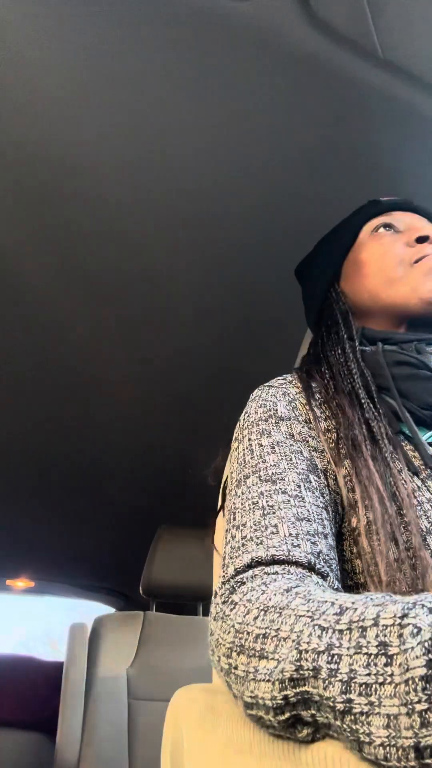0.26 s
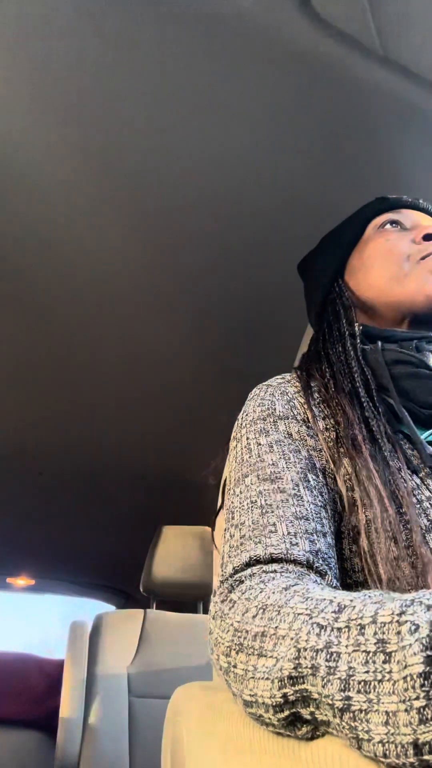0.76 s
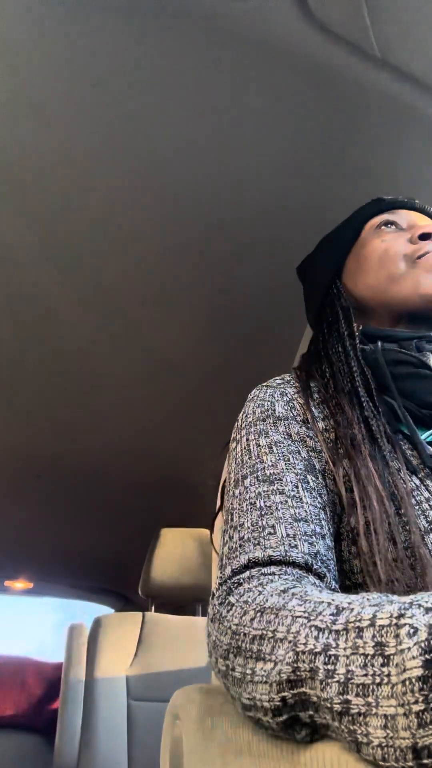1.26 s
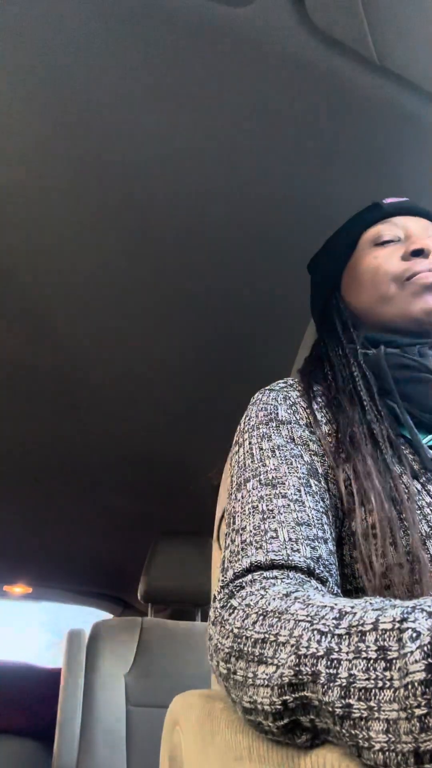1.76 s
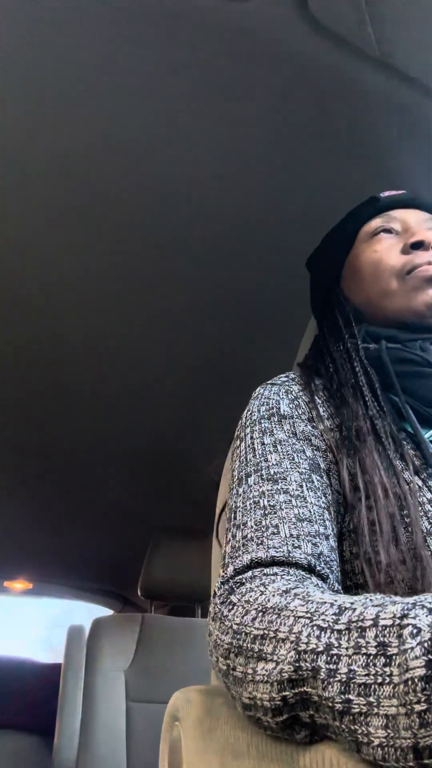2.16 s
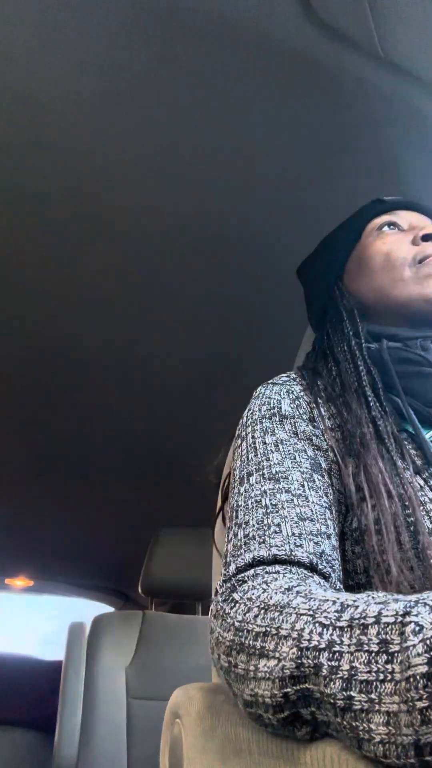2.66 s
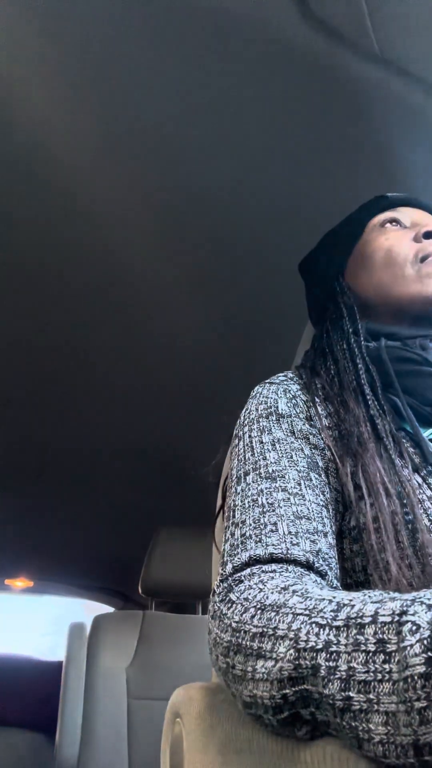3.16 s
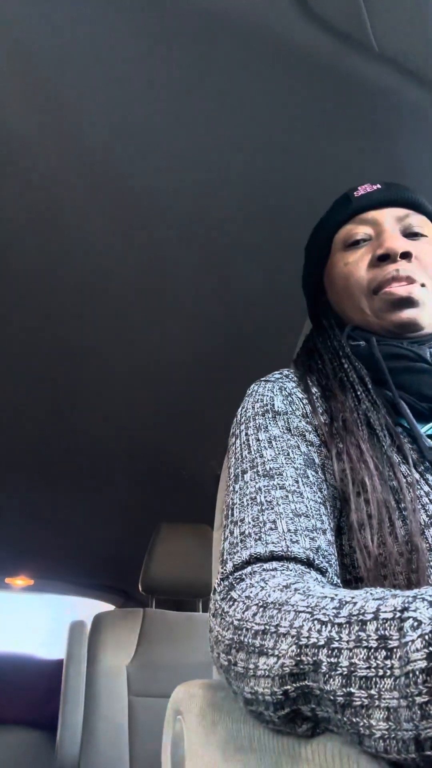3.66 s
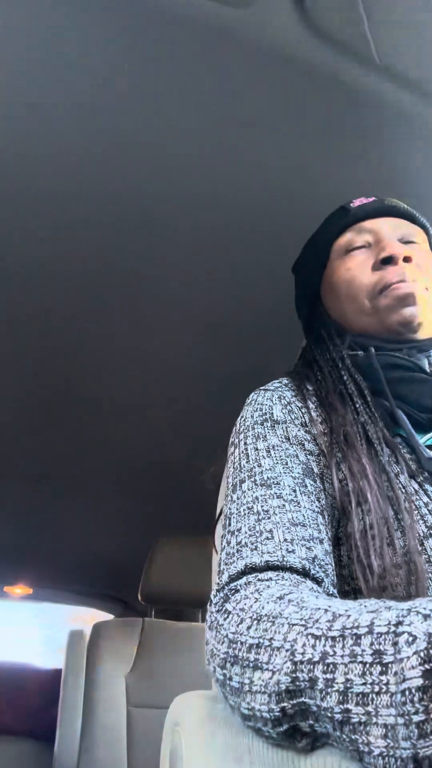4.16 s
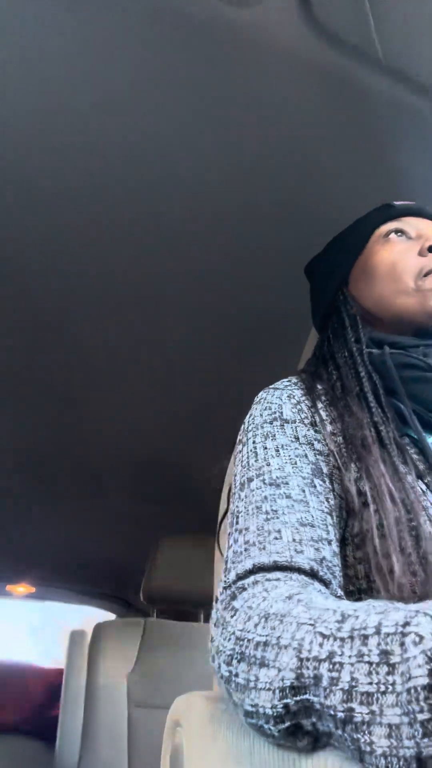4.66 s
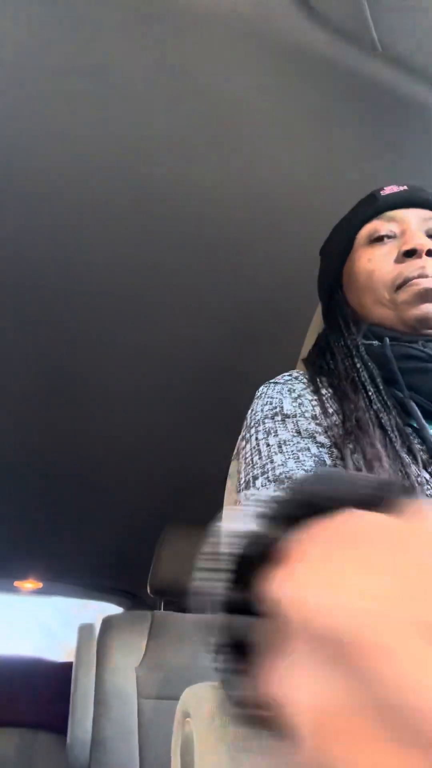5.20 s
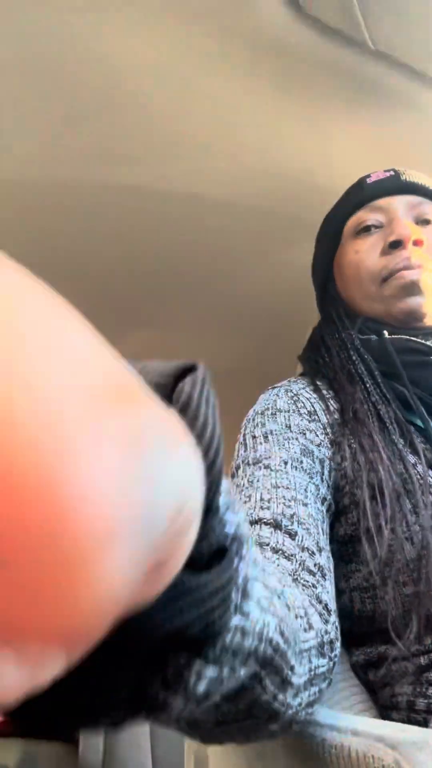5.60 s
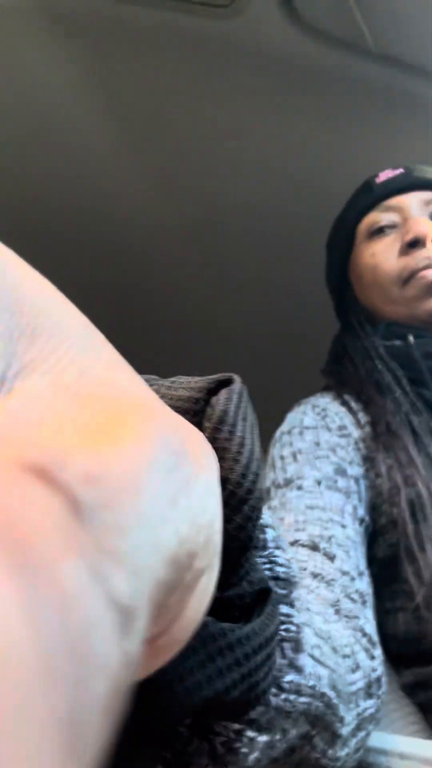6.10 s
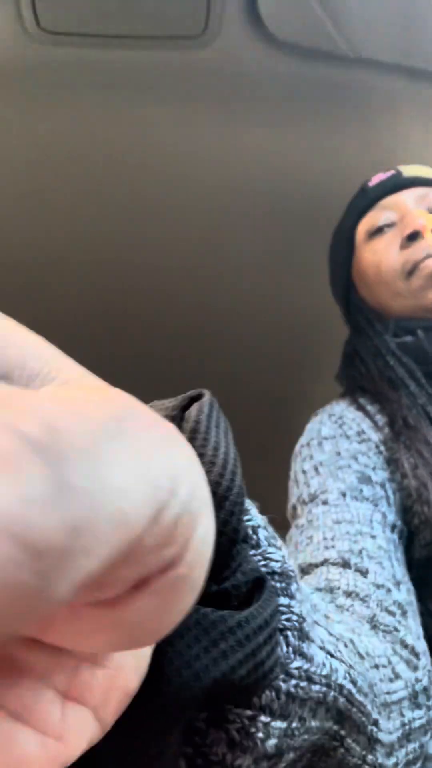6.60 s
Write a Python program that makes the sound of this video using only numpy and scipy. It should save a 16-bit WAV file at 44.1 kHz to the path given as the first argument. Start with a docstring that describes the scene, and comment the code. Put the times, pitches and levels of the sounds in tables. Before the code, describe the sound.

Car interior on city streets: deep body boom swells over bumps, with engine drone and muffled tyre roar. Very close to the right microphone, a phone rattles in its holder, bright ticks and duller tocks in uneven flurries with brief gaps. After about five seconds a hand takes hold; cloth and skin rustle, plastic creaks, a soft thud lingers, and the rattling stops.

```python
"""Inside a car on city streets, heard from a phone's two microphones. From the start the body booms, tyres
and engine drone through the cabin, and the phone rattles in its dashboard holder right beside its right
microphone: a bright tick one way, a dull tock back, made by short pushes that ring damped resonances.
Near the end a hand takes hold of the phone: cloth and skin rustle, the holder creaks and a dull thud
lingers. Boom is wavering sines and noise; drone, air and rustle are shaped noise with moving levels."""
import sys
import numpy as np
from scipy import signal
from scipy.fft import rfft, irfft, next_fast_len
from scipy.io import wavfile
from scipy.ndimage import uniform_filter1d, map_coordinates

SR = 44100
rng = np.random.default_rng(int(sys.argv[2]) if len(sys.argv) > 2 else 0)


def log_audio(samples):
    """Write samples as a 16-bit WAV file to the path given in sys.argv[1]."""
    # one column per channel
    frames = np.atleast_2d(samples).T
    # limit to full scale, then quantise
    limited = np.clip(frames, -1, 1)
    pcm = np.round(limited * 32767).astype(np.int16)
    wavfile.write(sys.argv[1], SR, pcm)


N = 301635  # length in samples

# Hard contacts of phone and holder. Each row: start in seconds, knock in dB,
# crack in dB before the lift common to all cracks.
TICK_HITS = [(0.0292, -13.5, -35.5), (0.0661, -14, -35), (0.1247, -6, -32), (0.1746, -4.5, -33.5),
             (0.2104, -16, -39), (0.5748, -8.5, -34.5), (0.6111, -19.5, -44), (0.7954, -8, -37.5),
             (0.832, -12, -39), (0.8508, -13, -48), (0.8853, -12.5, -33), (0.9393, -15.5, -37.5),
             (1.0353, -9, -34.5), (1.0858, -8, -31.5), (1.1164, -6.5, -30), (1.1459, -13, -38),
             (1.1767, -6.5, -30.5), (1.2307, -20.5, -44), (1.2813, -5, -36), (1.3166, -8.5, -38),
             (1.3567, -1.5, -38), (1.408, -16.5, -40), (1.499, -16.5, -47), (1.5323, -7, -33.5),
             (1.587, -12.5, -30), (1.6737, -13, -38), (1.7297, -2.5, -32.5), (1.7624, -9, -31.5),
             (1.8184, -23.5, -65.5), (1.894, -12, -39), (1.977, -6, -31), (2.0055, -7, -28.5),
             (2.2769, -7, -32.5), (2.3278, -7, -33), (2.3955, -12.5, -37), (2.471, -6.5, -33),
             (2.5263, -12, -39), (2.556, -8, -30.5), (2.5867, -5, -29), (2.6713, -7.5, -33.5),
             (2.7308, -17, -45), (2.7562, -17.5, -38), (2.7853, -6.5, -38), (2.8166, -10.5, -36.5),
             (2.8778, -13, -41.5), (2.927, -10.5, -36), (2.9567, -6, -32), (3.0066, -5.5, -30),
             (3.0425, -7, -32), (3.124, -14, -37), (3.41, -21, -59), (3.6764, -6.5, -33),
             (3.7281, -18, -44), (3.76, -19, -43), (3.7917, -11, -35), (3.8407, -9, -34), (3.8765, -6, -32),
             (3.9163, -13.5, -44), (3.9375, -17, -33.5), (3.9675, -15, -40), (3.992, -6, -33.5),
             (4.0266, -10.5, -36), (4.081, -7, -30.5), (4.119, -11, -37.5), (4.384, -9, -37),
             (4.426, -4.5, -29), (4.4786, -8.5, -35), (4.5074, -15.5, -37.5), (4.7043, -7, -39),
             (4.7423, -8.5, -34.5), (4.795, -1.5, -26), (5.042, -14, -32), (5.1255, -8.5, -33),
             (5.157, -9, -37.5), (5.252, -5, -31), (5.3155, -13.5, -34.5), (5.6198, -8, -27.5)]
# Padded contacts on the way back. Each row: start in seconds, knock in dB.
TOCK_HITS = [(0.0461, -4.5), (0.0808, -13.5), (0.141, -17), (0.192, -9), (0.2298, -27), (0.586, -16.5),
             (0.8112, -9), (0.8666, -6.5), (0.8932, -23.5), (1.1006, -8.5), (1.1306, -9.5), (1.1571, -7),
             (1.1902, -16.5), (1.297, -10), (1.339, -1), (1.3748, -16), (1.51, -20.5), (1.546, -18.5),
             (1.5984, -15), (1.6934, -12.5), (1.742, -9), (1.7776, -10.5), (1.984, -16), (2.0191, -14.5),
             (2.2846, -25), (2.342, -11), (2.3629, -8), (2.3744, -10.5), (2.4, -26), (2.487, -12.5),
             (2.5368, -16), (2.5686, -6.5), (2.6006, -6.5), (2.6855, -23), (2.7598, -21), (2.7967, -7),
             (2.8279, -13.5), (2.8869, -27), (2.9679, -22.5), (3.015, -22), (3.6854, -17), (3.7449, -8),
             (3.774, -18), (3.8001, -20.5), (3.8527, -23), (3.895, -8.5), (3.9209, -22), (3.945, -18),
             (4.0082, -4), (4.0458, -11), (4.0977, -12.5), (4.1243, -26), (4.4381, -17.5), (4.4893, -16),
             (4.518, -23), (4.724, 0), (4.7564, -9.5), (4.8077, -12), (5.1315, -19.5), (5.1742, -19.5),
             (5.3238, -23), (5.4715, -16.5), (5.4887, -11), (5.5062, -19), (5.519, -17.5), (5.6386, -24),
             (5.6557, -24.5), (5.6691, -7.5), (5.6888, -11), (5.6991, -15.5), (5.7421, -20),
             (5.7585, -21.5), (5.7697, -16), (5.8218, -16), (5.836, -25), (5.8826, -9), (5.904, -22),
             (5.9443, -27), (5.9613, -3.5)]
# Middle pitches of the shell's three boom modes, in Hz.
BOOM_HZ = [40.13, 57.8, 79.85]
# Noise colours of engine drone, tyre roar, skin on the case, cloth, and the finest rustle.
# Each row: frequency in Hz, relative level in dB per Hz.
DRONE_COLOUR = [(79, -42), (135, -6), (167, -7), (199, -1), (253, -4), (335, -6), (372, -13.5),
                (480, -16.5), (620, -32.5), (1060, -120)]
TYRE_COLOUR = [(250, -30), (420, -5.5), (472, -8), (587, -8.5), (628, -7.5), (896, -12.5), (1100, -31),
               (1430, -48.5), (2420, -120)]
SKIN_COLOUR = [(120, -55), (220, -8.5), (600, 0.5), (1200, -5.5), (2500, -8), (3600, -19.5), (6000, -50)]
CLOTH_COLOUR = [(1470, -42.5), (2500, -9.5), (2970, -15.5), (4890, -12), (5310, -14), (8980, -21.5),
                (9500, -38), (12400, -55.5), (20900, -120)]
FIZZ_COLOUR = [(5290, -35.5), (9000, -7), (11900, -4), (15000, -4.5), (16000, -11), (16500, -40)]


def amp(db):
    """Gain of a level in dB."""
    return 10 ** (np.asarray(db) / 20)


def unit(x):
    """Scaled to rms 1."""
    return x / np.sqrt(np.mean(x ** 2) + 1e-20)


def along(points, hz):
    """Values between (Hz, value) points, on a log frequency axis."""
    f, v = np.transpose(points)
    return np.interp(np.log(hz + 1), np.log(f + 1), v)


def curves(rows):
    """One value per sample for each column after the time."""
    s, *cols = np.transpose(rows)
    return [np.interp(np.arange(N) / SR, s, c) for c in cols]


def wobble(rate):
    """A smooth random curve, rate knots a second."""
    knots = rng.standard_normal(int(N * rate / SR) + 4)
    return map_coordinates(knots, [np.arange(N) * rate / SR])


def together(*gains):
    """Gain of unrelated parts sounding at once: their powers add."""
    return np.sqrt(sum(np.square(g) for g in gains))


def filtered(x, response):
    """x through a complex response of frequency, padded so that its ringing does not wrap round."""
    m = next_fast_len(x.shape[-1] + SR // 2)
    return irfft(rfft(x, m) * response(np.fft.rfftfreq(m, 1 / SR)), m)[..., :x.shape[-1]]


def modes(table):
    """Causal response of a set of damped resonances."""
    return lambda f: sum(sign * amp(db) * 1j * f * w / (c * c - f * f + 1j * f * w)
                         for c, w, db, sign in table)


def lagging(hz):
    """Turns the left channel behind the right by a phase that depends on frequency, half on each side."""
    # Each row: frequency in Hz, radians that the left is behind the right.
    lag = [(40, .17), (130, .1), (220, 0), (700, .1), (1100, 1.2), (1900, 2.8), (5500, 3.6), (6900, 3.1),
           (9700, 1.8), (12400, .5), (14000, 0)]
    return np.exp(1j * np.outer([-.5, .5], along(lag, hz)))


def rush(spectrum, patchy_db):
    """Noise of rms 1 over both microphones, with patches of random gain in time and pitch."""
    # Each row: frequency in Hz, likeness of left and right.
    alike = [(60, 0.85), (130, 0.85), (220, 0.83), (330, 0.51), (640, 0.69), (1100, 0.24), (1700, .3),
             (3000, 0.15), (6500, 0.27), (10000, .7), (13000, .88)]
    # Each row: frequency in Hz, left minus right in dB.
    lean = [(60, -1.3), (380, -1), (700, 2.5), (2400, 4.5), (8000, 4.5), (15000, -2.5)]
    z = signal.stft(rng.standard_normal((2, N)), nperseg=512)[2]
    field = uniform_filter1d(uniform_filter1d(rng.standard_normal(z.shape[1:]), 5, 0), 8, 1)
    pair = signal.istft(z * amp(patchy_db * unit(field)), nperseg=512)[1][:, :N]

    def colour(hz):
        turn = np.arccos(np.clip(along(alike, hz), -1, 1)) / 2  # shares noise between middle and side
        return amp(along(spectrum, hz)) * [np.cos(turn), np.sin(turn)]

    mid, side = filtered(pair, colour)
    placing = lambda hz: amp(np.outer([.5, -.5], along(lean, hz))) * lagging(hz)
    return unit(filtered(np.array([mid + side, mid - side]), placing))


def strike(seconds, db, short, long):
    """Blows at the given times, each a random blend of the short and the long contact's sound."""
    share = rng.uniform(size=len(seconds))
    at = np.round(seconds * SR).astype(int)
    return sum(signal.fftconvolve(np.bincount(at, amp(db) * part, N)[None], shape, axes=1)[:, :N]
               for part, shape in ((share, short), (1 - share, long)))


def knock(table, contact_s, paths):
    """A smooth push of the contact's length rings the modes; the left microphone gets it weak, late and dull."""
    through_db, dull_hz = -21, 1800  # loss common to all paths to the left, and its one-pole corner
    t = np.arange(2048) / SR
    push = np.sin(np.pi * np.clip(t / contact_s, 0, 1)) ** 2
    near = filtered(push, modes(table))
    arrivals = lambda f: sum(amp(through_db + db) * np.exp(-2j * np.pi * f * s) for s, db in paths)
    far = filtered(near, lambda f: arrivals(f) / (1 + 1j * f / dull_hz))
    return np.array([far, near]) / np.abs(near).max()


def rattle_knocks():
    """Ticks ring the phone case and tocks the holder arm; both travel through the phone."""
    # Resonances of case and arm. Each row: pitch in Hz, width in Hz, level in dB, signed gain on it.
    tick_modes = [(3120, 3760, 14.5, 0.94), (1296, 2600, -16.5, 1), (373, 23, -2.5, -1.24)]
    tock_modes = [(1650, 3700, 5.5, 0.97), (900, 200, -11, -1.2), (391, 58, 8.5, -0.76)]
    # Ways to the left microphone. Each row: delay in seconds, level in dB before the common loss.
    tick_paths = [(.00055, 5), (.0012, -7.5)]
    tock_paths = [(.00002, -10), (.0018, -3.5)]
    # the two numbers in each list: shortest and longest contact (s)
    tick_shapes = [knock(tick_modes, contact_s, tick_paths) for contact_s in (.00046, .0005)]
    tock_shapes = [knock(tock_modes, contact_s, tock_paths) for contact_s in (.00047, .00052)]
    tick_s, tick_db, _ = np.transpose(TICK_HITS)
    tock_s, tock_db = np.transpose(TOCK_HITS)
    return strike(tick_s, tick_db, *tick_shapes) + strike(tock_s, tock_db, *tock_shapes)


def rattle_cracks():
    """Each contact also cracks, a click and a burst of grit that ring bright modes through the air."""
    # Bright resonances. Each row: pitch in Hz, width in Hz, level in dB, signed gain on it.
    crack_modes = [(4970, 5600, 7.5, 0.54), (6270, 590, 6, 0.77), (6880, 310, -3.5, 0.73),
                   (9100, 780, -8, 0.44), (11030, 380, 0.5, 0.92), (11600, 100, 0, 0.7),
                   (13200, 690, 1.5, 1), (13800, 1100, -18, 0.95), (15600, 900, -22, 0.55)]
    # Each row: frequency in Hz, left minus right in dB.
    crack_lean = [(4000, -13.5), (6000, -5.5), (7500, 12), (9000, -2), (16000, 2)]
    grit_t60_s, lift_db = .0035, 13.0
    tick_s, _, crack_db = np.transpose(TICK_HITS)
    tock_s, tock_db = np.transpose(TOCK_HITS)
    t = np.arange(400) / SR
    clicks = np.zeros(N + len(t))
    for at, db in np.r_[np.c_[tick_s, crack_db], np.c_[tock_s, tock_db - 43]]:
        grit = rng.standard_normal(len(t)) * amp(-60 * t / grit_t60_s)
        # the crack leads the knock by four samples
        clicks[round(at * SR) - 4:][:len(t)] += amp(db + lift_db) * ((t == 0) + 0.35 * grit)
    ports = lambda f: amp(np.outer([.5, -.5], along(crack_lean, f))) * lagging(f)
    return filtered(clicks[:N], lambda f: modes(crack_modes)(f) * ports(f))


def shudder():
    """Every tock sets the holder's arm swaying for a few low cycles, its pitch settling downwards."""
    sway_hz, start_hz, settle_s = 295, 545, .003
    sway_db, t60_s = -11, .05  # level against the tock
    left_s, left_db = .001, -1  # later and softer at the left microphone
    # Rise times in seconds: left, right.
    rise_s = (.003, .001)
    t = np.clip(np.arange(SR // 16) / SR - np.array([[left_s], [0]]), 0, None)
    turns = sway_hz * t + (start_hz - sway_hz) * settle_s * (1 - np.exp(-t / settle_s))
    rise = 1 - np.exp(-t / np.reshape(rise_s, (2, 1)))
    fall = amp(sway_db - 60 * t / t60_s + np.array([[left_db], [0]]))
    sway = -np.cos(2 * np.pi * turns) * rise * fall
    s, db = np.transpose(TOCK_HITS)
    return strike(s, db + rng.normal(0, 1.5, len(s)), sway, sway)


def shaking():
    """How hard the dashboard shakes, from the knocks nearby in time; rms 1."""
    shake_s = 0.11  # width of each of two running means
    s, db = np.transpose([row[:2] for row in TICK_HITS + TOCK_HITS])
    energy = np.bincount(np.round(s * SR).astype(int), amp(db) ** 2, N)
    width = int(shake_s * SR)
    return unit(np.sqrt(np.abs(uniform_filter1d(uniform_filter1d(energy, width), width))))


def rustle():
    """Shaken trim, cloth and skin: grainy noise in three bands, swelling with hand, shaking and rubs."""
    # Hand and sleeve near the phone. Each row: time in seconds, rustle in dB.
    hold = [(4.9, -72), (5.2, -59), (5.5, -63), (5.75, -52), (6.05, -54.5), (6.35, -64.5), (6.7, -71.5),
            (6.84, -85)]
    # Rubs on the case. Each row: start in seconds, length in seconds, level in dB,
    # low part against it in dB, fizz against it in dB.
    rubs = [(3.495, 0.029, -63.5, 9, -24), (5.468, 0.048, -57.5, 16, -16), (5.577, 0.058, -53, 12, -12),
            (5.674, 0.039, -40.5, 12.5, -10), (5.712, 0.063, -52.5, 16.5, -10),
            (5.872, 0.048, -50.5, 6, -9), (5.95, 0.084, -50.5, 10, -45), (6.188, 0.046, -50.5, 4.5, -20),
            (6.27, 0.075, -53.5, 8, -24), (6.46, 0.033, -58, 9.5, -14), (6.578, 0.047, -61.5, 9, -20),
            (6.785, 0.07, -57.5, -12, -15)]
    edge_s = .006  # fade at either end of a rub
    trim_db, trim_fizz_db = -67, -82.5  # at average shaking: treble, top
    case_db, hold_fizz_db = 8.5, -12  # low part that the case carries, and fizz, against the rustle
    t, shake = np.arange(N) / SR, shaking()
    held = amp(np.interp(t, *np.transpose(hold), left=-120))
    strokes = []
    for s, length, db, low_db, fizz_db in rubs:
        window = np.clip(np.minimum(t - s, s + length - t) / edge_s + .5, 0, 1)
        strokes.append((amp(db) * window, amp(low_db), amp(fizz_db)))
    cloth = together(held, amp(trim_db) * shake, *[g for g, _, _ in strokes])
    low = together(amp(case_db) * held, amp(case_db + trim_db) * shake,
                   *[g * share for g, share, _ in strokes])
    fizz = together(amp(hold_fizz_db) * held, amp(trim_fizz_db) * shake,
                    *[g * share for g, _, share in strokes])
    grain = amp(1.5 * wobble(73) + 3.5 * wobble(400))
    return (cloth * unit(grain * rush(CLOTH_COLOUR, patchy_db=3.5))
            + fizz * unit(grain * rush(FIZZ_COLOUR, patchy_db=-2.5))
            + low * unit(grain * rush(SKIN_COLOUR, patchy_db=2.0)))


def scuffs():
    """Short scuffs and creaks where something slips on plastic: quick-rising, dying bursts in three bands."""
    # Each row: start in seconds, level in dB before the burst's shape,
    # low part against it in dB, high part against it in dB.
    grips = [(1.3206, -47, 15, -21), (2.6194, -45, 9, -11), (2.83, -36, 7, -18), (4.0341, -42.5, 19, -9),
             (4.2148, -49, 1, -10), (4.6886, -51.5, 14, -35), (4.9465, -39, -1, 0),
             (5.4652, -34.5, 11.5, -9.5), (5.5052, -50.5, 23, -21), (5.558, -46, 14, -17),
             (5.582, -42, -1, 1), (5.6034, -41, 10, -8), (5.61, -37, 16, -19), (5.673, -29, 13, -11),
             (5.6974, -30, 4, -17), (5.7683, -54, 13, -10), (5.8857, -34, -3, -4), (6.0392, -38, -1, -31),
             (6.1943, -29.5, 11, -14), (6.2437, -36, -13, 2), (6.3269, -29, 4.5, -15),
             (6.3981, -41, 2, -20), (6.4757, -44.5, 12, -33), (6.5902, -47, 14, -28)]
    t60_s, rise_s = 0.021, 0.00065
    t, levels = np.arange(SR // 8) / SR, np.zeros((3, N + SR))
    slip = amp(-60 * t / t60_s) * (1 - np.exp(-t / rise_s))
    for s, db, low_db, high_db in grips:
        levels[:, round(s * SR):][:, :len(t)] += amp(db + np.array([[low_db], [0], [high_db]])) * slip
    bands = (SKIN_COLOUR, CLOTH_COLOUR, FIZZ_COLOUR)
    return sum(level[:N] * rush(band, patchy_db=-4.5) for level, band in zip(levels, bands))


def grab():
    """The hand closes on the phone: a dull thud through the case that lingers while it settles."""
    start_s, rise_s, fall_after_s, t60_s = 5.61, 0.059, 0.14, 2.04  # fall counted from the start
    low_db, mid_db = -25.5, -36  # before the wavering
    t = np.arange(N) / SR - start_s
    grip = np.clip(t / rise_s, 0, 1) * amp(-60 * np.clip(t - fall_after_s, 0, None) / t60_s)
    low = amp(low_db) * rush(DRONE_COLOUR, patchy_db=1.0)
    mid = amp(mid_db) * rush(TYRE_COLOUR, patchy_db=0.5)
    return grip * amp(1.5 * wobble(40)) * (low + mid)


def swell(top_s, rise_s, fall_s):
    """A bell that rises to its top and falls at another speed."""
    t = np.arange(N) / SR - top_s
    return np.exp(-.5 * (t / np.where(t < 0, rise_s, fall_s)) ** 2)


def mode_levels():
    """The road's roughness feeds all modes; a bump feeds those near its pitch."""
    # Roughness under the wheels, heard as the steady boom. Each row: time in seconds, level in dB.
    rough = [(0, -20.5), (.45, -25.5), (1.2, -22.5), (1.8, -28.5), (2.2, -27.5), (2.8, -24), (3.4, -30),
             (3.9, -25.5), (4.2, -25), (4.28, -36), (4.36, -24.5), (5, -24), (5.8, -21), (6.15, -25),
             (6.5, -26.5), (6.84, -31.5)]
    # Bumps in the road, the last ones jolts of the hand.
    # Each row: top in seconds, level in dB, pitch in Hz that it favours.
    bump_rows = [(0.07, -22, 41.6), (0.08, -46, 150), (0.33, -19, 59.3), (0.35, -32, 150), (0.54, -25, 59),
                 (0.66, -23, 55), (0.88, -28.5, 150), (1.07, -21, 56.3), (1.36, -16, 59), (1.59, -23, 95.5),
                 (1.64, -16.5, 39), (1.99, -19, 46.3), (2.98, -21.5, 41.6), (3.73, -21.5, 45.2),
                 (3.75, -18, 81), (4.03, -20, 59.7), (4.08, -20.5, 91), (4.14, -21.5, 42),
                 (4.41, -15, 49.4), (4.49, -26, 77), (4.56, -26.5, 59), (4.71, -20.5, 50.6),
                 (4.83, -21.5, 45.2), (5.11, -23, 57.6), (5.43, -22, 47), (5.66, -16.5, 150),
                 (5.71, -10.5, 91.5), (5.97, -25.5, 150), (5.98, -15, 48.6), (6.22, -16, 49.6)]
    # Steady shares of the three body modes and the floor panel, in dB.
    share_db = [-1.5, -1.5, -7.5, -10]
    panel_hz = 129.6  # middle of the floor panel's band
    wander_db = 3  # each mode's share drifts
    narrow_db = 41  # loss of a mode one octave from the bump's pitch
    rough_db, = curves(rough)
    hz = np.array(BOOM_HZ + [panel_hz])
    steady = np.array([amp(rough_db + db + wander_db * wobble(9)) for db in share_db])
    bumps = []
    for s, db, pitch in bump_rows:
        mode_gain = amp(db - narrow_db * np.log2(hz / pitch) ** 2)
        bumps.append(np.outer(mode_gain, swell(s, rise_s=0.037, fall_s=0.047)))
    return together(steady, *bumps)


def body():
    """Road shocks keep the shell's modes ringing, each wavering in pitch, over low rumble and floor panel."""
    # Colours of rumble and floor panel. Each row: frequency in Hz, relative level in dB per Hz.
    rumble_colour = [(11, -35), (20, -12.5), (30, 0), (40, -1), (54, 1.5), (73, 5.5), (110, -13),
                     (140, -35), (240, -120)]
    panel_colour = [(60, -120), (85, -21.5), (100, -3.5), (130, 0.5), (150, -2), (175, -27.5), (260, -120)]
    rumble_db = -6.5  # against the modes' level curves
    *levels, panel = mode_levels()
    booms = 0
    for hz, level in zip(BOOM_HZ, levels):
        pitch = hz * (1 + 0.0902 * wobble(12))
        tone = np.sqrt(2) * np.sin(2 * np.pi * np.cumsum(pitch) / SR)
        booms = booms + level * tone * amp(1.4 * wobble(16))
    placed = amp(-0.5) * filtered(booms, lagging) * amp([[-.4], [.4]])
    rumble = amp(rumble_db) * together(*levels) * rush(rumble_colour, patchy_db=-0.5)
    return placed + rumble + panel * rush(panel_colour, patchy_db=-0.5)


def drone_and_tyres():
    """Engine and suspension drone with tyre roar, noise bands that share one quick unsteadiness."""
    # Each row: time in seconds, drone in dB before the unsteadiness.
    drone_rows = [(0, -31.5), (1.1, -30.5), (2.2, -33), (2.7, -31.5), (3.4, -34), (4.3, -33.5),
                  (4.65, -31.5), (5.1, -33.5), (6.84, -34)]
    tyre_mean_db, tyre_follows = -41.5, 0.65  # mean before the unsteadiness; share of the drone's swings
    drone_db, = curves(drone_rows)
    tyre_db = tyre_mean_db + tyre_follows * (drone_db - drone_db.mean())
    shake = wobble(9)
    drone = amp(drone_db + 0.86 * shake) * rush(DRONE_COLOUR, patchy_db=2.0)
    tyres = amp(tyre_db + .8 * shake + 0.2 * wobble(15)) * rush(TYRE_COLOUR, patchy_db=1.5)
    return drone + tyres


def air_and_buzz():
    """Air along the glass and the buzz of shaken trim, sharing one flickering noise band."""
    # Each row: frequency in Hz, relative level in dB per Hz.
    air_colour = [(560, -33.5), (950, -3.5), (1190, -5.5), (1500, -7), (1780, -6.5), (2170, -13),
                  (2410, -10), (2830, -17.5), (5000, -41.5), (6500, -64), (11000, -120)]
    air_db, buzz_db = -52.5, -54.5  # before the flicker; buzz at average shaking
    shade_s, shade_db = 6.05, -2  # from here on the hand shades the microphones from the air noise
    shade = shade_db * np.clip(10 * (np.arange(N) / SR - shade_s), 0, 1)
    level = together(amp(air_db + shade), amp(buzz_db) * shaking())
    return level * amp(0.59 * wobble(33)) * rush(air_colour, patchy_db=2.0)


def cabin(x):
    """The short, padded answer of seats and glass: noise tails that die sooner in the treble."""
    # Each row: frequency in Hz, time in seconds to fall by 60 dB.
    decay = [(500, 0.09), (3000, 0.052), (12000, 0.0068)]
    hz, t, z = signal.stft(rng.standard_normal((2, SR // 8)), SR, nperseg=128)
    tail = signal.istft(z * amp(-60 * t / along(decay, hz)[:, None]), SR, nperseg=128)[1]
    late = np.pad(x, (90, 0))[None]  # samples before the first answer
    return signal.fftconvolve(late, tail / np.linalg.norm(tail[0]), axes=1)[:, :N]


def hiss():
    """The microphones' own faint hiss, steady shaped noise."""
    # Each row: frequency in Hz, relative level in dB per Hz.
    hiss_colour = [(2000, -35), (3500, -11), (6000, -2), (9000, -14), (12000, -11), (16500, -11)]
    return amp(-77.0) * rush(hiss_colour, patchy_db=1.0)


def scene():
    """Everything at the two microphones, from the rattle close by to the hiss."""
    knocks, cracks = rattle_knocks(), rattle_cracks()
    echo = cabin(amp(-25) * knocks[1] + amp(-15) * cracks[0])  # right knocks, left cracks
    phone = knocks + cracks + shudder() + rustle() + scuffs() + grab()
    car = body() + drone_and_tyres() + air_and_buzz() + echo
    return phone + car + hiss()


def record(dry):
    """The input stage rounds off the highest peaks; the phone cuts steeply above its band limit."""
    top_hz = 16700
    rounded = dry / (1 + np.abs(dry / .95) ** 6) ** (1 / 6)
    return filtered(rounded, lambda hz: 1 / (1 + (hz / top_hz) ** 400))


dry = scene()
out = record(dry)
log_audio(out)
```